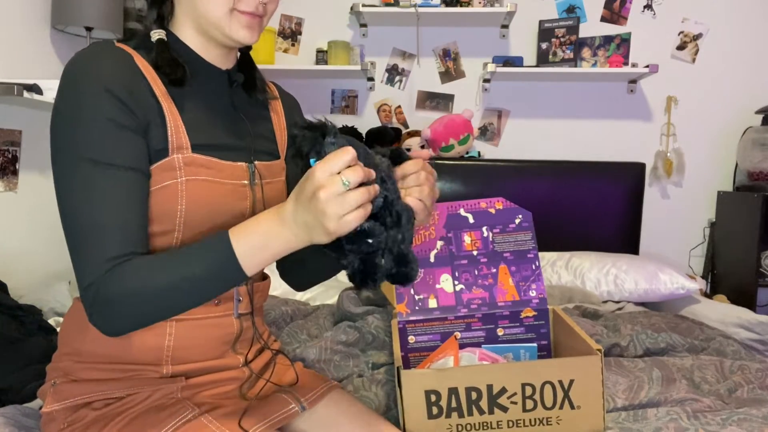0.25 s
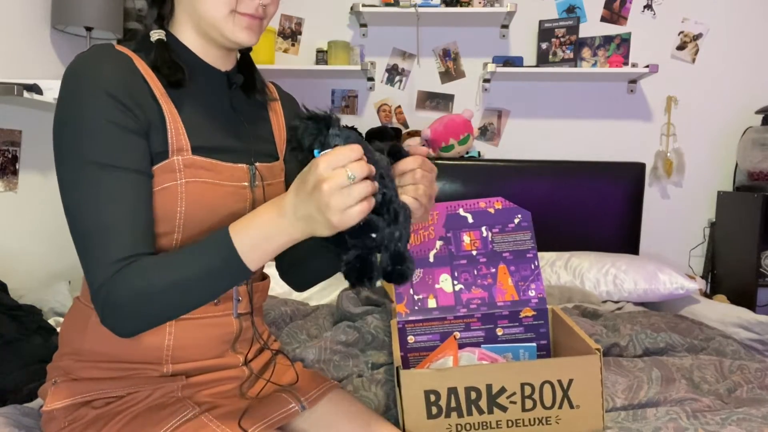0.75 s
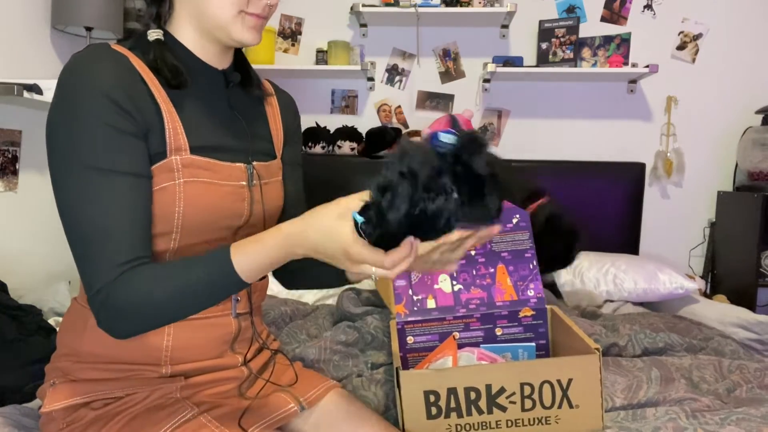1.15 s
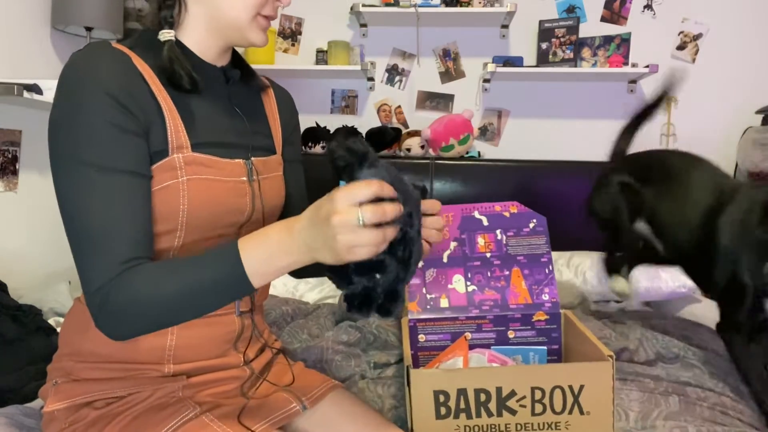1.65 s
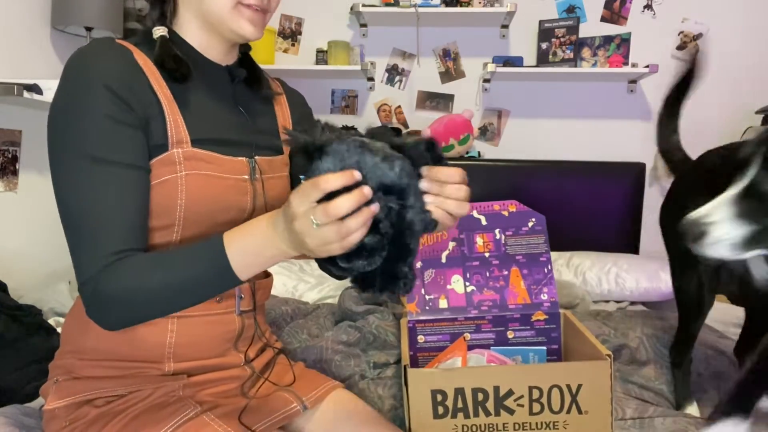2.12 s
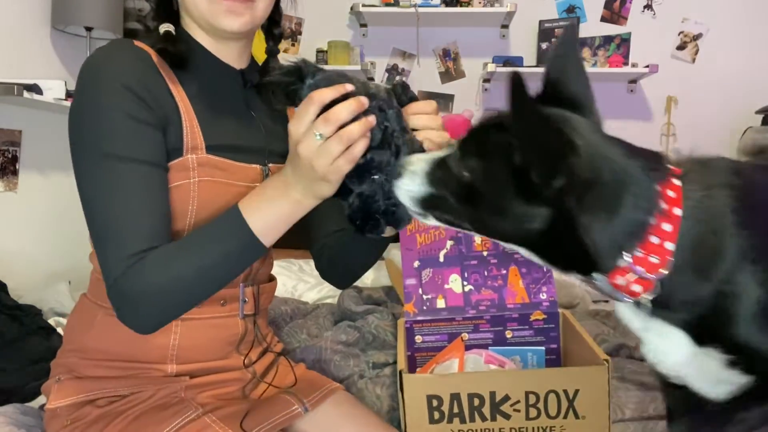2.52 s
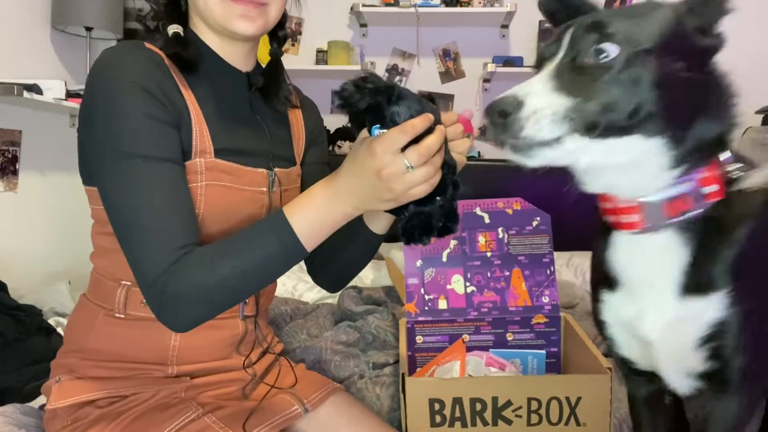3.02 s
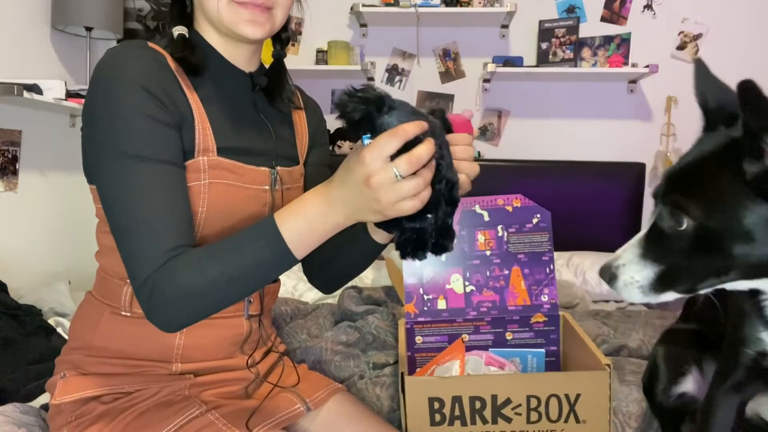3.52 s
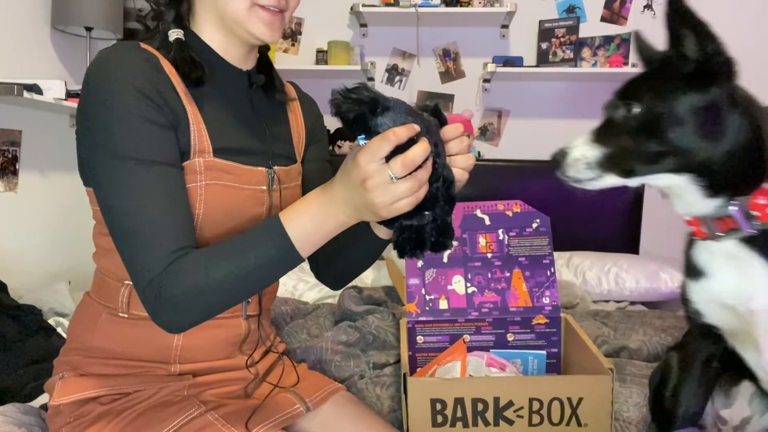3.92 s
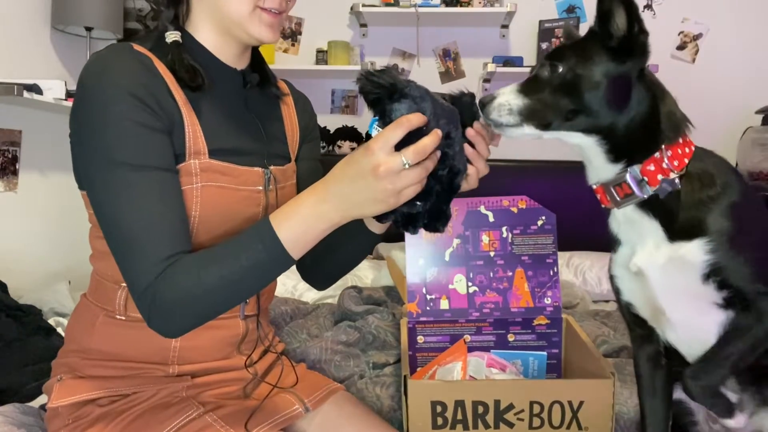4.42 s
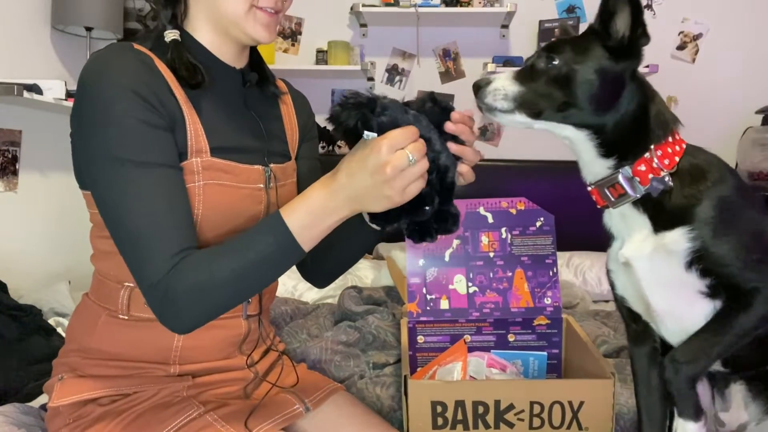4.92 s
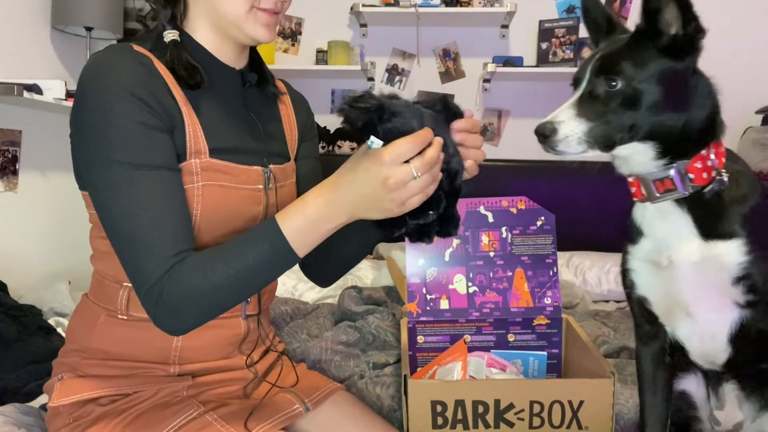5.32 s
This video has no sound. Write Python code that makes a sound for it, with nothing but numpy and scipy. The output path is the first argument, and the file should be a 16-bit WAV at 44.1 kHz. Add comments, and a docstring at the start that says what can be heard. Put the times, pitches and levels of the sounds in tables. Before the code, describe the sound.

A plush dog toy is squeezed again and again up close, giving quick, high, pitch-bending squeaks with fur rustling and small crackles.

```python
"""A bedroom, a clip-on microphone close to a plush dog toy that is squeezed again and again.
One reed squeaks on each squeeze, another as the bulb refills; air pressure sets pitch and loudness
together. The dented bulb pops back into shape and jolts the pitch. Fingers rustle the fur, hands bump,
a thin whistle sounds in a pause and a low buzz sometimes joins in. Puffs of air rumble at the
microphone, and behind the toy the soft room rings briefly."""
import sys
import numpy as np
from scipy import signal
from scipy.fft import rfft, irfft, next_fast_len
from scipy.io import wavfile
from scipy.ndimage import uniform_filter1d

SR = 44100
rng = np.random.default_rng(int(sys.argv[2]) if len(sys.argv) > 2 else 0)


def wav_out(sig):
    """Save sig, one row per channel (or a flat mono array), as 16-bit PCM at SR to the path in sys.argv[1]."""
    wavfile.write(sys.argv[1], SR, np.round(np.clip(np.atleast_2d(sig).T, -1, 1) * 32767).astype(np.int16))


N = 244843
TIME = np.arange(N) / SR
EDGE_HZ = 16000

# squeezes of the bulb (start [s], length [s], rise [s], fall [s], held pitch [Hz], late push [Hz],
# arch sharpness [-], gain [dB], swell from start to end [dB], then the grip: harmonic 2 [dB],
# harmonic 4 [dB], harmonic 8 [dB], harmonics 11 and up [dB], band centre [Hz], band gain [dB])
SQUEEZES = [(-.03, .23, 0.054, 0.12, 1354, 6.5, 0.46, 0.5, -1.5, -4, 3, 9.5, 3, 5450, -4.5),
            (0.521, 0.23, 0.055, 0.13, 1383, -13.5, 2, 0, 1, -2, 3, 6, 8, 4200, -7),
            (1.693, 0.16, 0.064, 0.055, 2075, 21, 3.24, 0.5, 1, -0.5, 3.5, 3, -3, 5100, -13),
            (2.128, .16, 0.073, 0.041, 1397, -52, 5.4, -1, 2.5, 0.5, 3, 1.5, 7, 4400, -3),
            (2.571, 0.13, 0.05, 0.051, 1364, -24.5, 2.46, 0.5, 1.5, 1.5, 1.5, 5, 6, 7970, -31),
            (2.948, 0.13, 0.06, .06, 1276, 7.5, 0.65, 0.5, -1, 2.1, 2, 4.5, 9, 3970, -25),
            (3.522, .155, 0.081, .068, 1961, 295.5, 4.3, 0.5, 0.5, 4, 2.5, 1, 2, 4300, -2),
            (3.846, 0.1, 0.036, 0.067, 1328, 5, 0.96, 0.6, 0, 0.5, 5, -1, 4, 4070, -24),
            (5.061, .133, 0.013, 0.048, 1201, 30, 1.45, -2.5, 5.5, -6.5, -5, -1, 6, 6200, -26),
            (5.367, .19, 0.022, 0.081, 1340, 153.5, 6.6, -0.5, 1, 3, 4.5, 5, 11, 7500, -4)]
# refills of the bulb (start [s], length [s], rise [s], fall [s], top pitch [Hz], sag [Hz], gain [dB],
# swell from start to end [dB], then the same six grip columns)
REFILLS = [(0.243, 0.26, 0.043, 0.041, 1206, 103, -1, -3.5, -2.3, -3.5, -1.5, 5, 7040, 7),
           (0.799, 0.3, 0.046, 0.13, 1194, 86.2, -1.75, -0.5, 0, 1.5, -2, 4.5, 3810, -23),
           (1.894, 0.22, 0.046, 0.059, 1194, 92, -2, -1.5, -3.5, -3.3, 5.5, -3.5, 6100, -12),
           (2.359, .18, 0.028, 0.034, 1192, 138, 0.2, 2.5, -2.5, -1.5, -4.5, 3, 5865, 18.5),
           (2.742, 0.17, 0.036, 0.014, 1147, 94, 1.1, 1.3, -1, -1, -7, 0, 5120, -40),
           (3.118, 0.19, 0.033, .068, 1153, 55.8, 1, .7, -2, -5.5, -5.5, 1.5, 3950, -12),
           (3.712, 0.11, .043, 0.024, 1169, 67, 0, -1, -0.8, 3.5, -7.5, -4, 4170, -22),
           (3.991, .21, 0.029, 0.063, 1153, 90, 0, -0.5, -1, -2.5, -3, -3, 5500, -26)]
# low notes under a gentle press or a hard squeeze
# (start [s], length [s], top pitch [Hz], level [dB], overtone gain [dB])
BUZZES = [(1.759, 0.057, 1062, -37, 24.5), (4.838, .161, 1044, -26, 5), (5.508, .07, 1040, -27.5, 9.5)]
# more pressure makes a reed both higher and louder (pitch [Hz], level of the fundamental [dB])
SQUEEZE_LOUDNESS = [(980, -30), (1110, -18), (1230, -14.5), (1380, -11.5), (2100, -9)]
REFILL_LOUDNESS = [(950, -26), (1020, -22.5), (1110, -15.5), (1220, -11.5)]
# reed overtones against the fundamental (frequency [Hz], gain [dB])
SQUEEZE_COLOUR = [(2000.0, -3.5), (2800.0, -5.5), (3600.0, -9.5), (4600.0, -16.0), (5600.0, -26.5),
                  (6700.0, -24), (8000.0, -26), (9400.0, -29.5), (10900.0, -35.5), (12500.0, -40),
                  (14000.0, -45), (16000.0, -50)]
REFILL_COLOUR = [(2000, -3), (2800, -6.5), (3600, -13), (4600, -19), (5600, -30), (6700, -35.5),
                 (8000, -25), (9400, -23), (10900, -32.5), (12500, -31), (14000, -37), (16000, -45)]
BUZZ_COLOUR = [(2080, -7.5), (3100, -13.5), (4150, -16), (5200, -19.5), (6250, -24), (7300, -24.5),
               (9400, -27.5), (10500, -28), (15000, -45)]
# spectra of air in the reed, rubbed fur, snapping fibres, air at the microphone and room tone
# (frequency [Hz], relative level [dB])
AIR_COLOUR = [(400, -11), (1000, -3), (2200, -12), (4000, -4.5), (8000, -12), (11000, -18), (16000, -23)]
RUB_COLOUR = [(88, -31), (150, -11.5), (309, -4), (1310, 3), (2140, 1.5), (3620, -3.5), (4080, -6),
              (7040, -24.5), (12400, -12), (14800, -13.5), (16000, -40)]
SNAP_COLOUR = [(1500, -11), (4000, -11), (8000, -13), (13000, 2), (16000, -6)]
DRAUGHT_COLOUR = [(8, 15.5), (20, -0.5), (35, -8), (50, -11), (70, -22.5), (120, -25.5), (250, -36),
                  (600, -37), (2000, -59)]
HUSH_COLOUR = [(60, 0), (130, -1), (300, -12), (950, -13), (3000, -45), (7000, -37), (16000, -49)]
# fur rubbed as the toy is turned and gripped anew (time [s], level [dB])
RUBBING = [(0, -40.5), (.8, -45), (1.08, -34), (1.24, -54), (1.5, -37.5), (1.59, -43), (1.66, -31.5),
           (1.8, -47), (3.5, -46), (4.39, -45.5), (4.47, -58.5), (4.63, -57.5), (4.68, -36.5),
           (4.85, -36.5), (5.01, -53), (5.25, -48.5), (5.32, -38), (5.55, -45)]
# moving air at the microphone (time [s], level [dB])
DRAUGHT = [(0, -28.5), (.3, -32.5), (.7, -27.5), (1.05, -19.5), (1.37, -11), (1.65, -16), (1.9, -22),
           (2.7, -23.5), (3.4, -33), (3.55, -20.5), (3.75, -21.5), (4.4, -28.5), (5.3, -29.5),
           (5.55, -24.5)]
# the bedroom's ring (frequency [Hz], time to fade by 60 dB [s])
ROOM_T60 = [(300, 0.61), (1200, 0.23), (3000, 0.34), (8000, 0.25), (15000, 0.14)]
# tone of its reflections (frequency [Hz], relative level [dB])
ROOM_COLOUR = [(300, -10.5), (1200, -3.5), (3000, -4), (8000, 4.5), (15000, -31)]
# the bulb pops back (time [s], peak [dB], pitch [Hz], jolt to the refill reed [Hz])
POPS = [(.4185, -12.5, 630, 96.5), (0.9874, -10.5, 610, 79), (1.079, -8, 640, 131), (1.326, -18.5, 540, 0),
        (2.032, -14, 584, 88.5), (2.5174, -16.5, 540, 82), (2.885, -46, 129, 27), (3.237, -33.5, 228, 54.5),
        (4.1329, -21.5, 646, 66.5)]
# fabric and plastic crackle under the fingers (time [s], peak [dB], brightness [Hz])
CRACKLES = [(.6123, -20, 3000), (.929, -14, 3730), (1.1276, -17, 1890), (1.2095, -18.5, 2480),
            (1.3067, -22, 2200), (1.414, -21, 2400), (1.4772, -17, 3700), (2.3156, -22, 3700),
            (3.146, -15, 1980), (3.369, -40, 8900), (4.0357, -18.5, 2100), (4.2293, -21, 3500),
            (4.244, -23.5, 6340), (4.2775, -16, 3350), (4.351, -27, 2600), (4.399, -33, 2620),
            (4.5255, -26.5, 2380), (4.5389, -34, 7300), (4.614, -34, 5960), (4.638, -29.5, 3000),
            (4.585, -31, 2300), (4.659, -21, 3700), (4.6769, -13.5, 1500), (4.704, -23, 11100),
            (4.711, -16, 4500), (4.7205, -14, 2000), (4.738, -21, 3000), (4.764, -20, 3100),
            (4.8344, -19, 5300), (5.277, -36, 2400), (5.3026, -25, 2600), (5.326, -25, 3000)]
# soft bumps of hands, toy and bedding (time [s], envelope peak [dB], pitch [Hz])
BUMPS = [(1.102, -28, 300), (1.148, -27, 90), (1.233, -35, 60), (1.343, -26, 81), (1.387, -26, 91.5),
         (1.489, -31, 100), (2.93, -35, 97), (3.545, -31, 69), (3.552, -31, 282), (3.925, -31, 284),
         (4.434, -37.5, 127), (4.668, -36, 75), (5.462, -41, 55)]
# a thin whistle while the bulb rests (time [s], level [dB])
WHISTLE = [(1.31, -76), (1.34, -46), (1.43, -88), (1.62, -53), (1.68, -54)]
# the whistle and a faint band of hiss above it (centre [Hz], width [Hz], relative level [dB])
WHISTLE_BANDS = [(9690, 150, 9), (15300, 500, 0)]


def amp(db):
    """Decibels to gain."""
    return 10 ** (np.asarray(db) / 20)


def unit(x):
    """Scales to rms 1."""
    return x / np.sqrt(np.mean(x ** 2) + 1e-20)


def at_hz(points, hz):
    """Reads a curve on a log-frequency axis."""
    f, value = np.transpose(points)
    return np.interp(np.log(hz + 1), np.log(f + 1), value)


def level(curve, t=TIME):
    """Gain at times t from rows (time [s], level [dB])."""
    return amp(np.interp(t, *np.transpose(curve)))


def add(mix, start, sound):
    """Mixes a sound in at a start time in seconds."""
    part = mix[max(round(start * SR), 0):][:len(sound)]
    part += sound[:len(part)]


def coloured(x, colour):
    """Filters x by a spectrum, at rms 1."""
    size = next_fast_len(N, True)
    gain = amp(at_hz(colour, np.fft.rfftfreq(size, 1 / SR)))
    return unit(irfft(rfft(x, size) * gain, size)[:N])


def wander(t, rate_hz):
    """Random drift of about unit size."""
    return np.interp(t * rate_hz, np.arange(2048), rng.standard_normal(2048), period=2048)


def span(start, length):
    """The sample times of an event, with a short margin."""
    return TIME[(TIME > start - .0015) & (TIME < start + length + .004)]


def ramp(t, start, length):
    """Goes from 0 to 1 over the given time."""
    return np.clip((t - start) / max(length, 1 / SR), 0, 1)


def bell(u, sharpness):
    """Falls from 1 at u = 0 to 0 at u = 1, with a round top."""
    return (1 - u ** 2) / (1 + sharpness * u ** 2)


def ticks(per_s, decay_s=.00055, spread_db=3):
    """Tiny noise bursts at random times, a few louder than the rest."""
    sizes = amp(spread_db * np.minimum(rng.exponential(1, N), 3))
    kicks = sizes * (rng.random(N) < per_s / SR)
    envelope = signal.lfilter([1], [1, -np.exp(-1 / (SR * decay_s))], kicks + 1e-12)
    return envelope * rng.standard_normal(N)


def reed(t, hz, db, grip, colour, air, attack, release, jitter, shimmer_db, rush_db=-30.5, roughness=0):
    """A reed chops the airflow into harmonics; the air rushes through it in puffs, once a cycle."""
    *harmonic_db, band_hz, band_db = grip
    registers_hz, band_half_width_hz = [1650, 1900, 2130], 133
    # with roughness set, the squeak sounds rough at its highest pitches and as its pitch falls
    high = np.clip((hz - 1400) / 250, 0, 1)
    glide = uniform_filter1d(np.gradient(np.log(hz)), size=400) * SR
    falling = np.clip(-glide / 4, 0, 1)
    rough = roughness * np.maximum(falling, .51 * high)
    # a high pitch is drawn up to halfway toward the nearest register, above or below it
    register = abs(hz[:, None] - registers_hz).argmin(axis=1)
    hz = hz + .5 * high * (np.take(registers_hz, register) - hz)
    hz = hz * (1 + jitter * (1 + 2 * rough) * wander(t, 700) + .0017 * wander(t, 60))
    phase = 2 * np.pi * np.cumsum(hz) / SR
    tone = np.sin(phase) * amp(.21 * wander(t, 170))
    for k in range(2, 17):
        grip_db = np.interp(k, [2, 4, 8, 11], harmonic_db)
        grip_db = grip_db + band_db / (1 + ((k * hz - band_hz) / band_half_width_hz) ** 2)
        # every register has its own mix of overtones
        register_mix = rng.standard_normal(len(registers_hz))[register]
        register_db = 3 * high * uniform_filter1d(register_mix, size=40)
        # fingers and stuffing shade each overtone differently as they move
        shade_db = shimmer_db * min(np.log(k), 1.5) * (wander(t, 22) + .4 * wander(t, 250))
        smear = .2 * rough * np.log(k)
        partial = np.sin(k * phase + smear * wander(t, 600))
        partial *= (1 + smear * wander(t, 450)) / np.hypot(1, smear)
        partial_db = at_hz(colour, k * hz) + grip_db + register_db + shade_db - .5 * falling
        tone += amp(partial_db) * partial * (k * hz < EDGE_HZ)
    puffs = (1 + .5 * np.cos(phase)) * air[round(t[0] * SR):][:len(t)]
    rush = amp(rush_db - rough + 3 * high) * puffs
    gate = ramp(t, t[0], attack) * np.clip((t[-1] - t) / release, 0, 1)
    return t[0], amp(db) * gate * (tone + rush)


def squeeze(air, start, length, rise, fall, held_hz, push_hz, sharpness, db, swell_db, *grip):
    """The hand builds pressure, holds it and lets it collapse; pitch and loudness follow."""
    onset_hz, stall_hz = 1080, 993
    t, release_at = span(start, length), start + length - fall
    hz = held_hz + push_hz * ramp(t, start + rise, length - rise - fall) ** 3
    hz = onset_hz + (hz - onset_hz) * bell(1 - ramp(t, start, rise), sharpness)
    hz = stall_hz + (hz - stall_hz) * bell(ramp(t, release_at, fall), sharpness)
    loud_db = at_hz(SQUEEZE_LOUDNESS, hz) + db + swell_db * (ramp(t, start, length) - .5)
    return reed(t, hz, loud_db, grip, SQUEEZE_COLOUR, air,
                attack=.0035, release=.0053, jitter=.0032, shimmer_db=2.5, roughness=1)


def squeaker():
    """Air leaves through one reed and returns through the other; a low buzz sometimes joins in."""
    out, air = np.zeros(N), coloured(rng.standard_normal(N), AIR_COLOUR)
    for stroke, rows in (squeeze, SQUEEZES), (refill, REFILLS), (buzz, BUZZES):
        for row in rows:
            add(out, *stroke(air, *row))
    return out


def rubbing():
    """How hard the fur is rubbed: slow handling plus one swell with every stroke."""
    t = TIME[::64]
    power = level(RUBBING, t) ** 2
    for rows, centre, width, db in (SQUEEZES, .3, .4, -41), (REFILLS, .55, .38, -39):
        for start, length, *_ in rows:
            progress = (t - start) / length
            power += amp(db) ** 2 * np.exp(-((progress - centre) / width) ** 2)
    return np.interp(TIME, t, np.sqrt(power))


def fur():
    """Close up, fibres slip in clumps of small ticks over a soft hiss; a few snap with a high fizz."""
    rub = coloured(unit(ticks(per_s=650)) + amp(-5) * rng.standard_normal(N), RUB_COLOUR)
    fizz = coloured(ticks(per_s=80), [(2000, -41), (7000, 9), (12000, -2), (16000, -12)])
    clumps = amp(3 * wander(TIME, 90))
    return rubbing() * clumps * (rub + amp(-14) * fizz)


def snaps():
    """Single fibres snap with faint, sharp ticks throughout."""
    return amp(-58) * coloured(ticks(per_s=41, decay_s=.00056), SNAP_COLOUR)


def draught():
    """Slow lumps of moving air rumble right at the microphone."""
    rumble = coloured(rng.standard_normal(N), DRAUGHT_COLOUR)
    return level(DRAUGHT) * rumble * signal.windows.tukey(N, .015)


def room_tone():
    """The steady hush of the bedroom."""
    return amp(-59.5) * coloured(rng.standard_normal(N), HUSH_COLOUR)


def room(x, wet_db):
    """Sparse reflections reach the microphone from 4 ms on, each band dying at its own speed."""
    count, reflections_per_s = SR // 2, 3000
    taps = rng.standard_normal(count) * (rng.random(count) < reflections_per_s / SR)
    taps *= TIME[:count] > .004
    hz, t, bands = signal.stft(taps, SR, nperseg=256)
    fade_db = at_hz(ROOM_COLOUR, hz)[:, None] - 60 * t / at_hz(ROOM_T60, hz)[:, None]
    tail = signal.istft(bands * amp(fade_db), SR, nperseg=256)[1]
    return amp(wet_db) * signal.fftconvolve(x, tail / np.linalg.norm(tail))[:N]


def refill(air, start, length, rise, fall, top_hz, sag_hz, db, swell_db, *grip):
    """The bulb sucks hardest at first, sags, is jolted when its dent pops out, and runs down."""
    onset_hz, stall_hz = 1076, 954
    jolt_delay_s, jolt_width_s = .0021, .009
    t, release_at = span(start, length), start + length - fall
    hz = top_hz - (top_hz - onset_hz) * (1 - ramp(t, start, rise)) ** 2
    hz -= sag_hz * np.sin(np.pi / 2 * ramp(t, start + rise, length - rise - fall)) ** 2
    hz += (stall_hz - hz) * ramp(t, release_at, fall)
    for pop_at, _, _, jolt_hz in POPS:
        hz += jolt_hz * np.exp(-((t - pop_at - jolt_delay_s) / jolt_width_s) ** 2)
    loud_db = at_hz(REFILL_LOUDNESS, hz) + db + swell_db * (ramp(t, start, length) - .5)
    return reed(t, hz, loud_db, grip, REFILL_COLOUR, air,
                attack=.0037, release=.0083, jitter=.0022, shimmer_db=2.75)


def pops():
    """The bulb's wall snaps over in one push and pull."""
    out, t = np.zeros(N), np.arange(-.015, .015, 1 / SR)
    for pop_at, db, hz, _ in POPS:
        phase = 2 * np.pi * hz * t
        add(out, pop_at + t[0], -amp(db) * phase * np.exp((1 - phase ** 2) / 2))
    return out


def crackles(decay_s=.00017, tail_s=.0013, tail_db=-18):
    """Fabric and plastic give under the fingers: each a tiny broad burst with a short rasp after it."""
    out, t = np.zeros(N), TIME[:900]
    envelope = np.exp(-t / decay_s) + amp(tail_db) * np.exp(-t / tail_s)
    for start, db, hz in CRACKLES:
        band = signal.butter(1, [hz / 3, min(hz * .7, EDGE_HZ)], "band", fs=SR)
        burst = signal.lfilter(*band, envelope * rng.standard_normal(len(t)))
        add(out, start, amp(db) * burst / abs(burst).max())
    return out


def bumps(cycles=.74):
    """Hands and toy bump on soft things: a heavily damped swing that starts softly."""
    out, t = np.zeros(N), TIME[:SR // 10]
    for start, db, hz in BUMPS:
        age = 2 * t * hz / cycles
        add(out, start, amp(db) * age * np.exp(1 - age) * np.sin(2 * np.pi * hz * t))
    return out


def whistle():
    """A thin whistle near 9.7 kHz, with a faint band of hiss near 15.3 kHz."""
    hz = np.fft.rfftfreq(N, 1 / SR)
    peaks = sum(amp(db) / (1 + (2 * (hz - centre) / width) ** 2) for centre, width, db in WHISTLE_BANDS)
    narrow_noise = unit(irfft(rfft(rng.standard_normal(N)) * peaks, N))
    sounding = (TIME > WHISTLE[0][0]) & (TIME < WHISTLE[-1][0])
    return sounding * level(WHISTLE) * narrow_noise


def buzz(air, start, length, top_hz, db, bright_db):
    """A reed holds a low, nearly level note that droops as it stops."""
    arch_hz, droop_hz, droop_s = 21.1, 55, .01
    t = span(start, length)
    hz = top_hz - arch_hz * (1 - np.sin(np.pi * ramp(t, start, length)))
    hz -= droop_hz * np.exp((t - t[-1]) / droop_s)
    grip = (bright_db, bright_db, bright_db, 0, 0, 0)
    return reed(t, hz, db, grip, BUZZ_COLOUR, air,
                attack=.0048, release=.0065, jitter=.0026, shimmer_db=2.9, rush_db=-23.5)


def scene():
    """The toy up close, the bedroom behind it; one microphone feeds both channels."""
    toy = squeaker() + pops() + bumps() + crackles() + snaps() + fur() + whistle()
    mono = toy + room(toy, wet_db=-15) + draught() + room_tone()
    return np.array([mono, mono])


def record(dry):
    """The recorder cuts off the top of the treble."""
    lowpass = signal.firwin(511, EDGE_HZ, window=("kaiser", 9), fs=SR)
    return signal.oaconvolve(dry, lowpass[None], "same")


dry = scene()
out = record(dry)
wav_out(out)
```